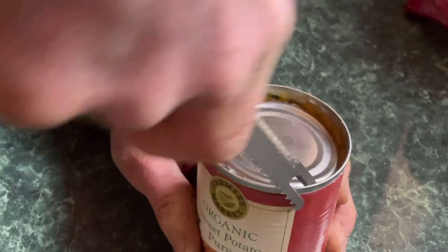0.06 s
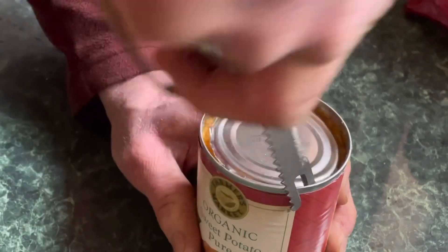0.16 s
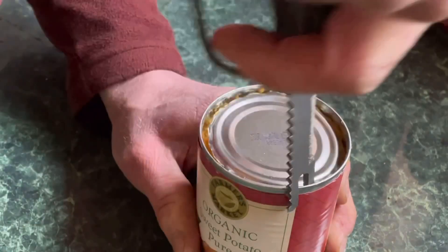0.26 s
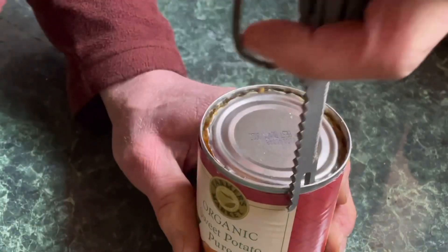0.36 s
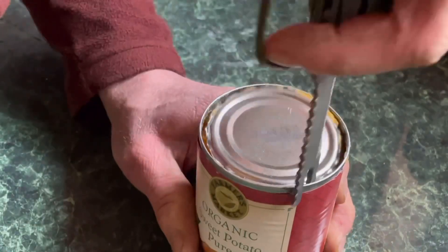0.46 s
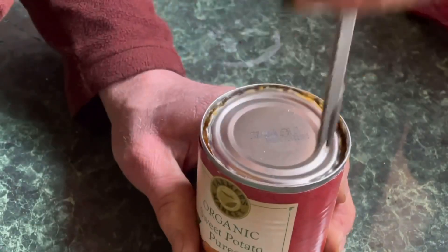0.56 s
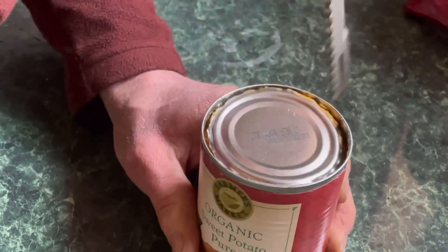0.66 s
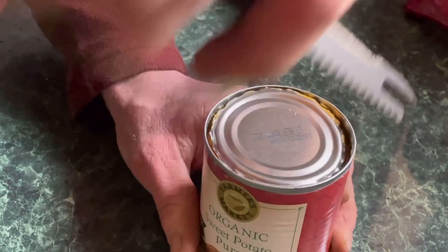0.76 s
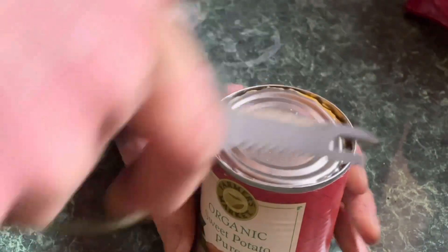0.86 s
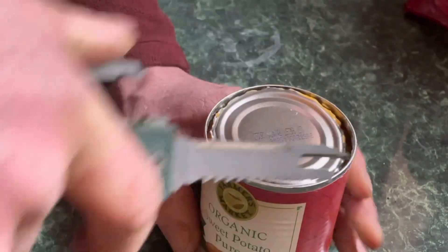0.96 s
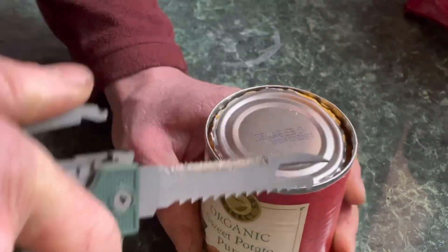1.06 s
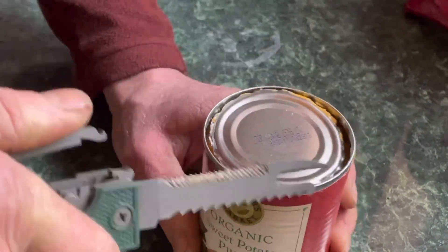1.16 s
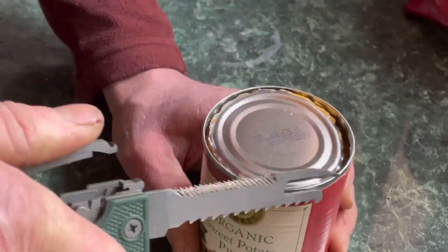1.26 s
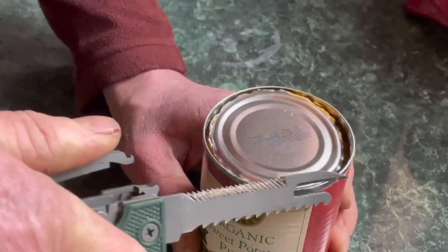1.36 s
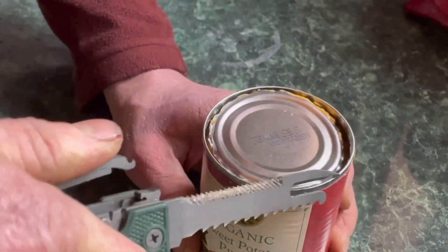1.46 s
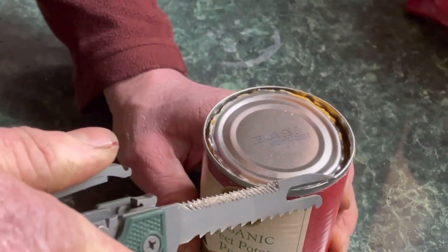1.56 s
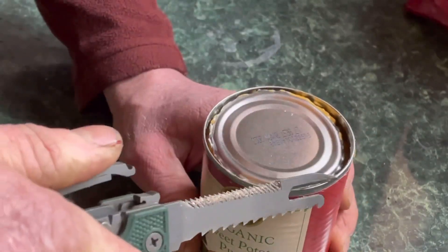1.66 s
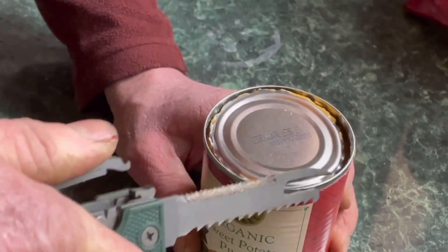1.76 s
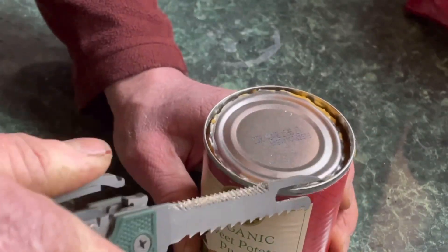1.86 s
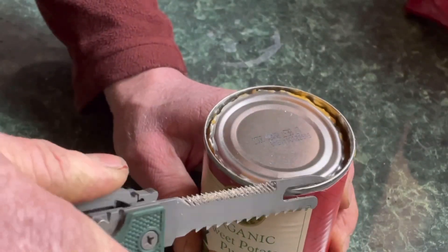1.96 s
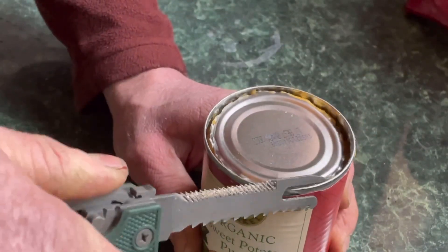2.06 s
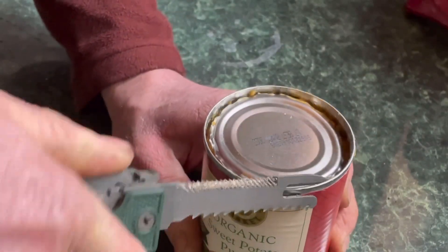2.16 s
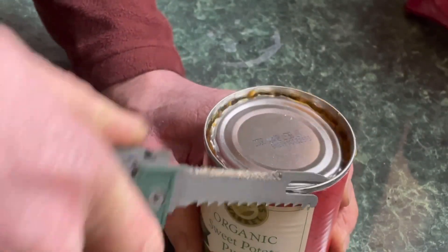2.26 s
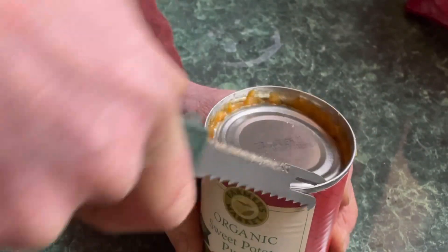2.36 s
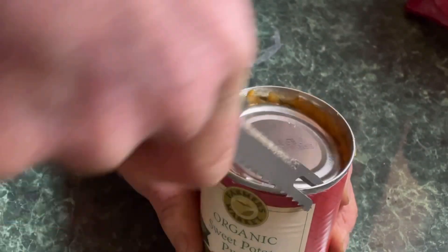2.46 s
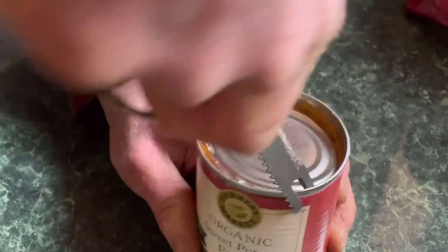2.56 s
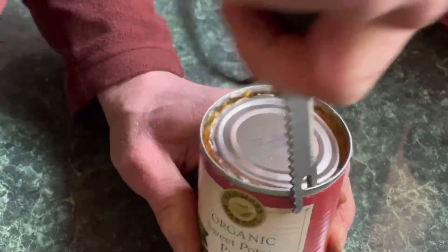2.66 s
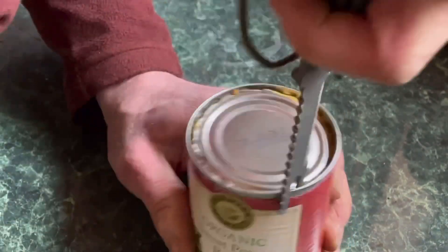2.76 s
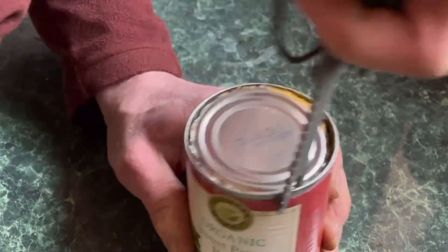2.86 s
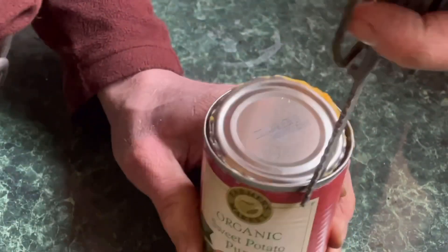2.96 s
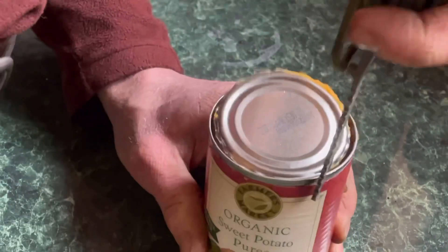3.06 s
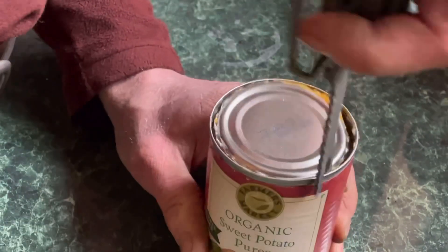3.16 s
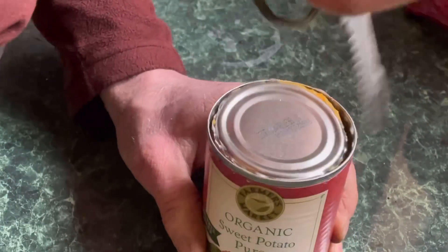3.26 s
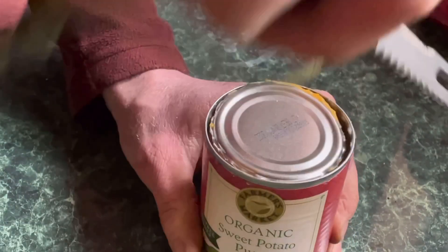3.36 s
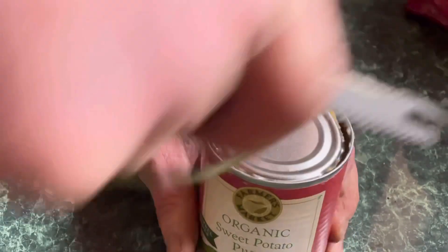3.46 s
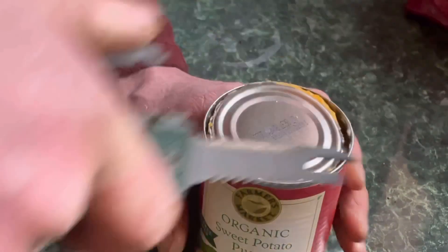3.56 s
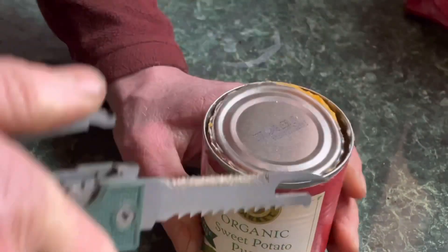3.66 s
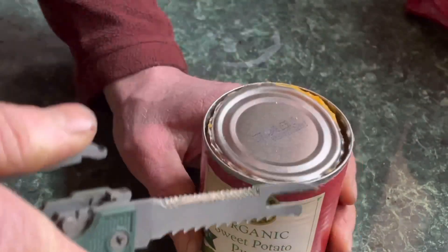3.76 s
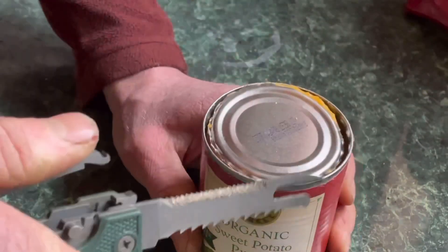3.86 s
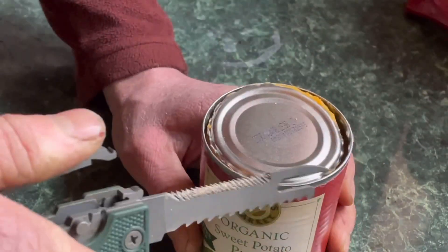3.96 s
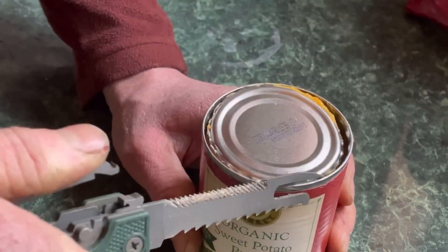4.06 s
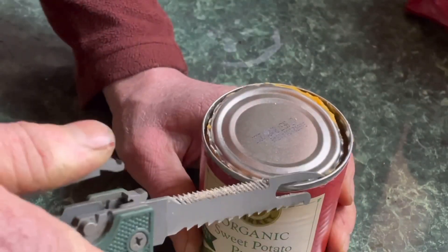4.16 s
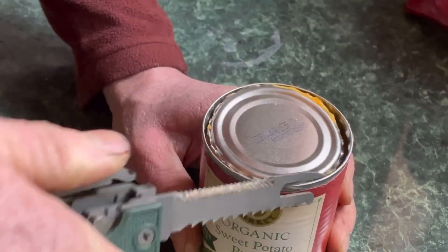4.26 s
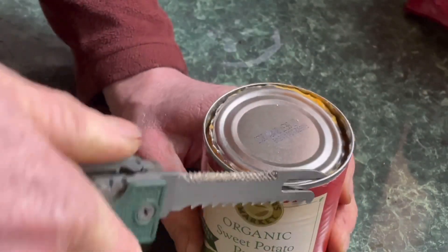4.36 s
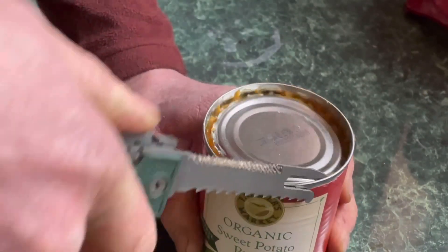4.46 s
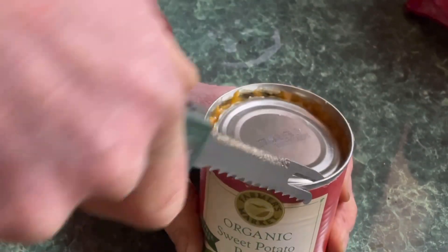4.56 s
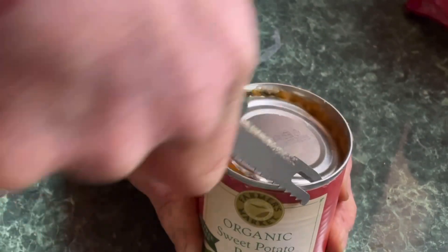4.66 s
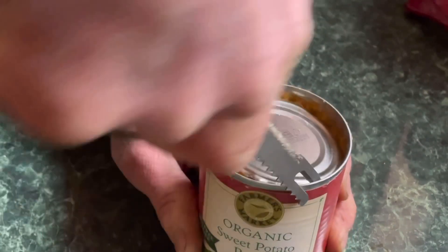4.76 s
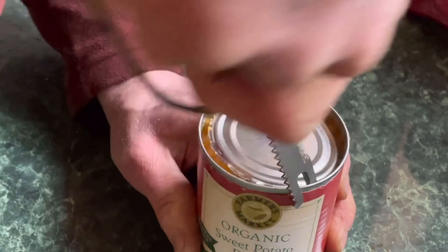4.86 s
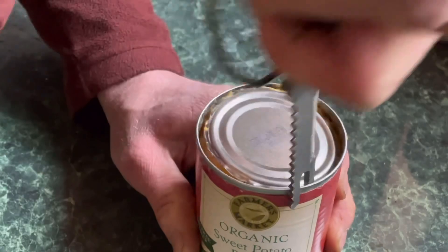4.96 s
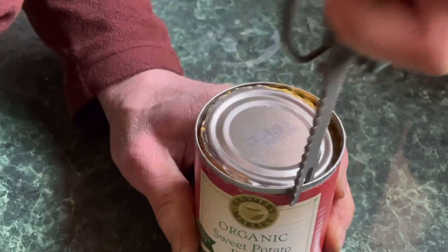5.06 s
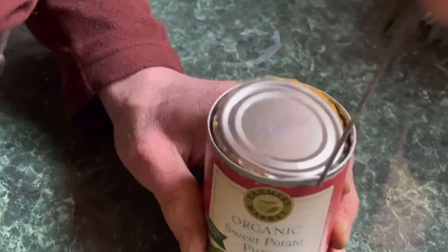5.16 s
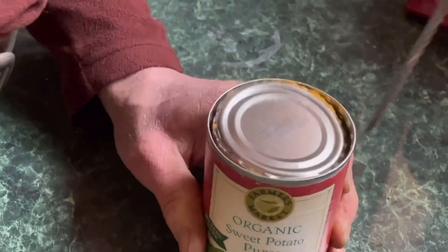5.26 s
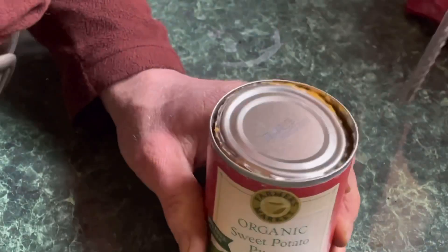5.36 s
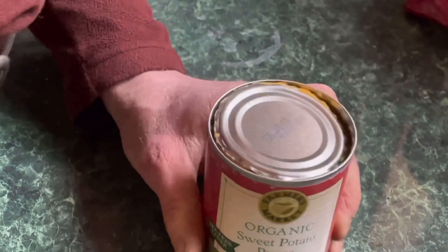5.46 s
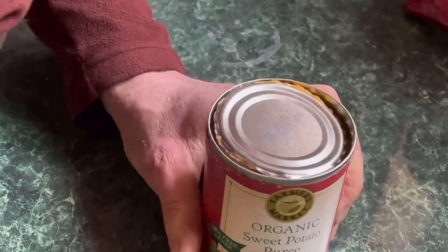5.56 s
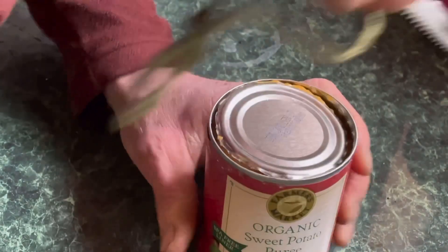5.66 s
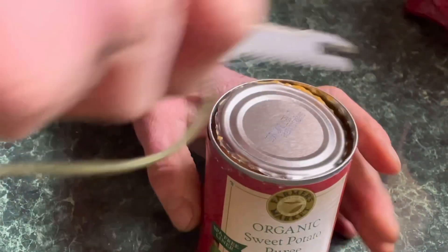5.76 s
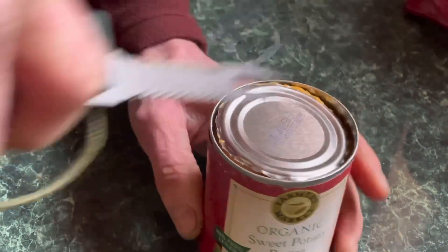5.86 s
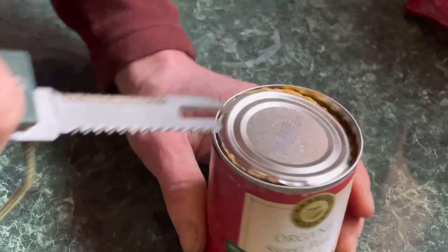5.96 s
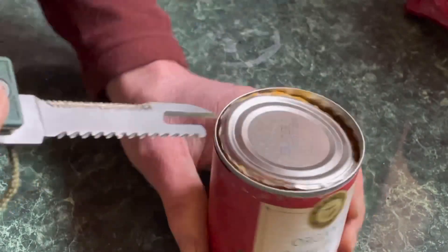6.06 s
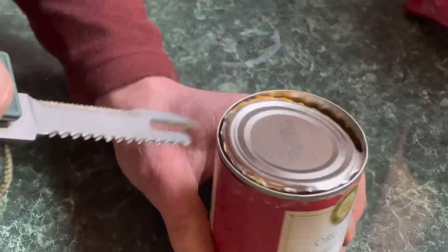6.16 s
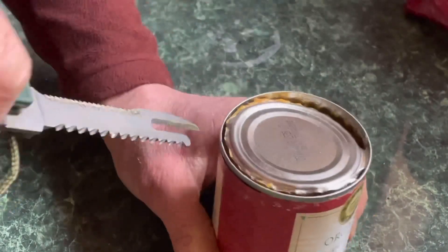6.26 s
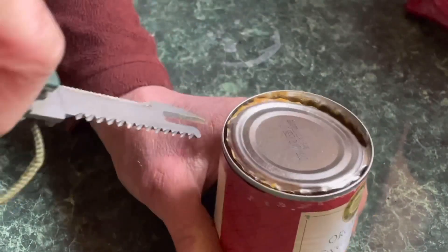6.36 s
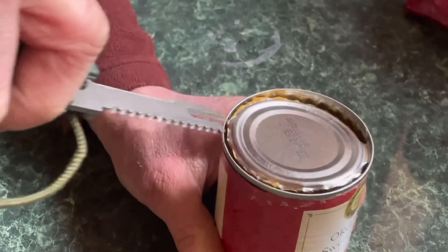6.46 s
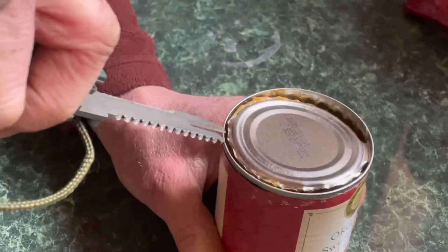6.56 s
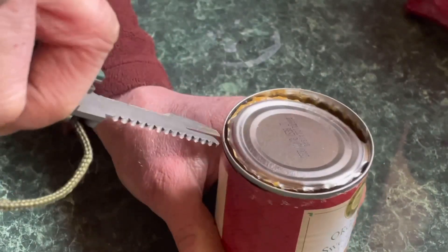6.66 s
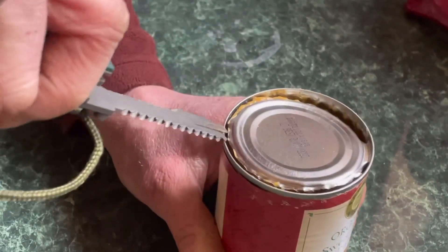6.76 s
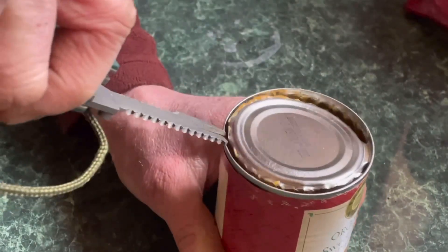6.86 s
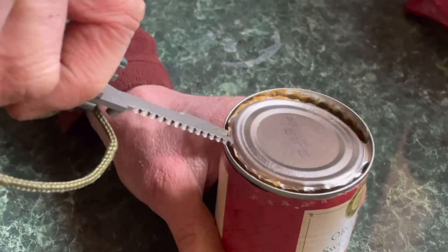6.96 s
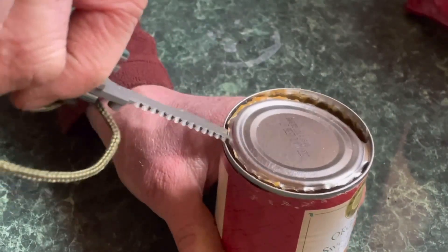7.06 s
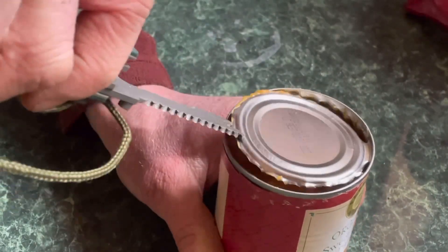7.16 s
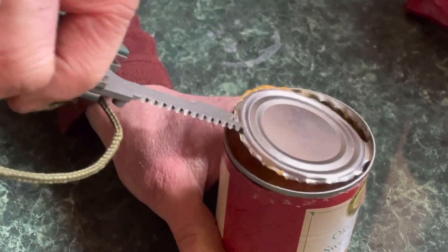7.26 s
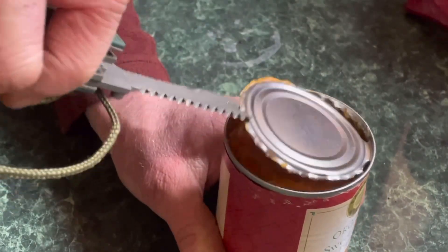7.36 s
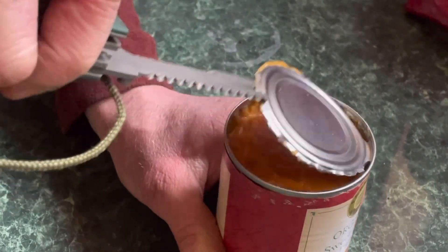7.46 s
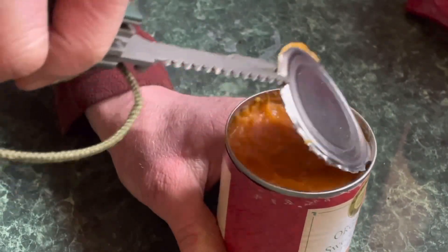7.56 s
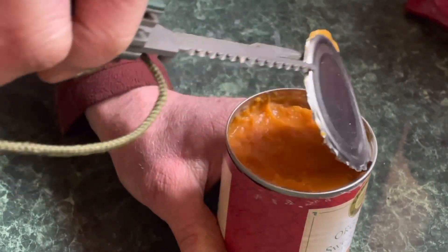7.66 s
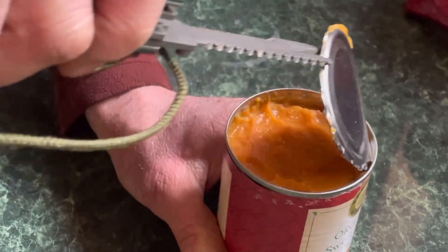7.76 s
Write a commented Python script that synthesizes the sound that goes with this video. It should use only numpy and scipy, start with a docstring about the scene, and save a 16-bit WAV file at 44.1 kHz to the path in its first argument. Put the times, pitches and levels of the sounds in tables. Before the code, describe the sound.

A filled steel can is opened by hand with a hooked pocket-tool blade, heard close on a kitchen counter. Gritty grinding leads to a sharp squeal, then rim scuffs, clicks and dull punching knocks. Levering and squealing return near three and five seconds. The tin is tapped and shifted with light ticks, then short creaks lift the lid. Close stereo microphone, dry small room, faint steady air noise.

```python
"""Kitchen counter, close to a two-port microphone: a tin is opened with the hooked blade of a pocket tool.
The hook grinds at the lid from the start, clicks onto the rim and tears free with a first squeal.
It scuffs the rim, punches the lid and is levered upward, squealing out of the cut twice more near 3 s and at 5 s.
Then the tin is tapped and slid round, and the tip creaks as it prises the lid up.
Knocks ring resonances, stick-slip clicks drive the friction, and diffuse echoes and still air lie behind."""
import sys
import numpy as np
from scipy import signal
from scipy.fft import rfft, irfft
from scipy.io import wavfile
from scipy.ndimage import uniform_filter1d

SR = 44100
rng = np.random.default_rng(int(sys.argv[2]) if len(sys.argv) > 2 else 0)


def wrap_up_sound(samples):
    """Save the sound to the file named by the first command line argument, as 16-bit audio."""
    columns = np.atleast_2d(samples).T
    # keep every value between -1 and 1, then stretch to whole-number steps
    tamed = np.clip(columns, -1, 1)
    steps = np.round(tamed * 32767).astype(np.int16)
    wavfile.write(sys.argv[1], SR, steps)


N = 343980   # samples, 7.8 s

# Still air. Each row: frequency in Hz, relative spectrum level in dB per Hz.
AIR_SPECTRUM = [(15, -37.5), (25, -4.5), (70, -6), (200, -16.5), (405, -15), (1040, -19.5), (1160, -30),
                (1290, -24.5), (7110, -39), (8830, -53.5), (9840, -44), (13200, -33), (16000, -62)]
AIR_DB = -73
# Kitchen decay. Each row: frequency in Hz, time to fall 60 dB in seconds.
ROOM_T60 = [(100, 0.2), (800, 0.1538), (2100, 0.25), (5500, 0.1649), (15000, 0.38)]
# Kitchen echoes ahead of their mix. Each row: frequency in Hz, level in dB.
ROOM_LEVEL = [(100, -8), (500, -4), (1200, -10), (2100, -22), (5500, -11), (15000, -22.5)]
# Microphone ports, phase. Each row: frequency in Hz, lead of left over right in radians.
PORT_PHASE = [(60, .2), (300, -.3), (520, -.7), (950, .7), (1400, 0), (2500, 0), (3700, .5), (5200, .4),
              (5800, -1.1), (7000, -.9), (7800, -2.2), (8600, -3.0), (9600, -3.5), (11800, -5.4),
              (12800, -6.1), (16500, -6.4)]
# Microphone ports, level. Each row: frequency in Hz, left minus right in dB.
PORT_BALANCE = [(60, -2), (200, -2), (500, -2.5), (1100, 4.5), (1500, 0.5), (2100, -1), (15000, 1.5)]
CUTOFF_HZ = 16400

# Friction colours: counter rumble, tin wall, cutting edge, tin sliding on the counter.
# Each row: frequency in Hz, relative spectrum level in dB per Hz.
RUMBLE_SPECTRUM = [(15, -49.5), (25, -20), (70, 2), (113, -4), (145, -1.5), (188, -9), (226, -1.5),
                   (296, -11.5), (344, -15.5), (457, -21.5), (480, -19), (620, -38), (1060, -120)]
WALL_SPECTRUM = [(220, -35.5), (380, -7), (454, -9), (495, -8), (621, -10), (824, -12), (1050, -9),
                 (1440, -16), (1650, -11), (2140, -35.5), (3630, -120)]
EDGE_SPECTRUM = [(4000, -9), (4800, -1.5), (5150, -8.5), (5500, -8.5), (6200, -6.5), (6900, -0.5),
                 (8000, -3.5), (10000, -8), (13300, -4.5), (16500, -13)]
SLIDE_SPECTRUM = [(820, -26.5), (1400, -20.5), (2050, 5.5), (2440, 2.5), (2900, 3), (3430, -2),
                  (4800, -11.5), (6240, -47), (10600, -120)]
# One resonance each of wall and edge that a hard scrape singles out.
# Each holds: frequency in Hz, width in Hz, level in dB against the broad rasp.
WALL_RING = (1080, 200, -1.5)
EDGE_RING = (5450, 390, -7.5)

# In all gesture tables below, the levels hold at the crest of the push, and swell is how far
# below the crest the push starts (negative: above it).
# The hand shifts the tin on the counter.
# Each row: start in seconds, rise in seconds, fall in seconds, rumble in dB, wall in dB, steel in dB, edge in dB.
SLIDES = [(0.55, 0.027, 0.89, -64, -71.5, -74, -66.5), (1.5, 0.15, .1, -59.5, -72, -77, -84),
          (1.98, .04, 0.19, -67, -78.5, -83.5, -80), (3.2, 0.18, 0.52, -66.5, -73.5, -74, -72),
          (5.25, 0.053, 0.45, -60.5, -63.5, -66, -59.5), (5.72, 0.31, 0.12, -56, -51, -55.5, -55),
          (6.16, 0.16, 0.24, -68.5, -78, -79, -81)]
# The blade bears on the tin and rocks it.
# Each row: start in seconds, rise in seconds, fall in seconds, rumble in dB, wall in dB, steel in dB, edge in dB.
PRESSES = [(0.39, 0.02, 0.1, -40, -47.5, -65, -55), (1.19, 0.11, 0.058, -43, -52.5, -62, -66),
           (1.4, .07, 0.33, -51, -63.5, -72.5, -78), (1.67, .04, 0.084, -49.5, -54.5, -53.5, -69),
           (1.79, .11, 0.057, -40, -56.5, -54.5, -67), (2.0, .03, 0.088, -53.5, -84, -83, -78),
           (2.21, .035, .01, -62.5, -61, -59.5, -61.5), (2.77, .02, .09, -51.5, -64, -64, -66),
           (2.85, 0.15, .03, -48.5, -56.5, -59.5, -60.5), (3.04, .05, 0.1, -39.5, -57, -52, -65),
           (3.73, .09, 0.098, -53.5, -58.5, -62, -69.5), (3.98, 0.063, 0.21, -45, -58.5, -59, -81),
           (4.19, .04, 0.67, -56.5, -68.5, -65.5, -66.5), (4.48, .03, .04, -50, -59.5, -57.5, -65),
           (5.015, .07, .2, -40.5, -56.5, -65.5, -67), (6.88, .04, .1, -48, -61, -56, -63.5),
           (7.07, 0.092, 0.1, -48, -70, -60, -65), (7.39, 0.071, 0.029, -48.5, -67.5, -78.5, -75)]
SLIDE_SWELL_DB, PRESS_SWELL_DB = 15.5, 5
RUB_ATTACK_S = 0.014
GRIP_DB = -72   # low rumble of the hand that holds the tin
# The hook is levered through the lid.
# Each row: start in seconds, rise in seconds, fall in seconds, swell in dB of effort, rumble in dB, wall in dB,
# steel in dB, edge in dB, grind in dB, first pitch in Hz, last pitch in Hz.
STROKES = [(0.0, 0.0054, 0.17, -21.5, -41, -44, -40.5, -51.5, -38, 1940, 1780),
           (0.135, 0.013, 0.21, -1.5, -43.5, -50.5, -46.5, -55.5, -38, 1850, 1770),
           (2.246, 0.2, 0.0073, 3.5, -51.5, -50.5, -52, -58.5, -55.5, 2067, 2090),
           (2.438, 0.052, 0.12, 8.5, -39, -42.5, -37, -48.5, -43.5, 2113, 2000),
           (2.6, 0.13, 0.062, 7.5, -46, -53.5, -47.5, -64.5, -43, 1930, 1779),
           (4.53, .14, 0.013, 2.5, -50.5, -53.5, -55.5, -66, -71, 2145, 2140),
           (4.676, 0.11, 0.14, 7.5, -44, -51.5, -38, -58, -41, 2090, 1930),
           (4.885, 0.0075, 0.11, 2, -53, -55.5, -48.5, -55, -44, 1953, 2040)]
# How far each part of a stroke follows the effort, in dB per dB, in the order rumble, wall, steel, edge, grind.
FOLLOWS = [0.99, 1.3, 1.31, 1.7, 1.45]
# Blade rubbing on tin. Each row: frequency in Hz, width in Hz, relative level in dB.
RUBBED_BLADE = [(2080, 170, 6.5), (3040, 50, -24.5), (3655, 120, -5.5), (5100, 140, -16), (5610, 180, -11.5)]

# The hook scuffs the rim. Each row: start in seconds, rise in seconds, fall in seconds, swell in dB,
# wall in dB, low rim modes in dB, high rim modes in dB, edge in dB.
SCUFFS = [(0.78, 0.013, 0.046, 14.5, -51, -52.5, -55.5, -45.5),
          (1.101, 0.0063, 0.021, 9.5, -37.5, -54, -43, -40),
          (1.13, 0.031, 0.01, 17, -33.5, -37, -64.5, -38.5),
          (1.255, 0.028, 0.011, 3, -44, -46.5, -54.5, -58),
          (1.415, 0.051, 0.066, 9.5, -47.5, -51.5, -61, -59),
          (1.645, 0.02, 0.012, 20, -38.5, -38.5, -42, -39), (2.97, 0.029, 0.016, 14, -44, -47.5, -55, -55),
          (3.42, 0.024, 0.022, 22, -47.5, -70, -73.5, -52), (3.805, 0.043, 0.013, 14, -47, -47, -48.5, -44),
          (4.2, 0.02, 0.017, 19, -49, -43, -65, -57), (5.035, 0.0086, 0.034, 5.5, -51, -50.5, -71.5, -67.5),
          (5.54, .012, .03, 2, -60, -64, -63, -53)]
# The tip creaks under the lid. Each row: start in seconds, rise in seconds, fall in seconds, swell in dB,
# wall in dB, low lid modes in dB, high lid modes in dB, edge in dB.
PRISES = [(6.75, 0.0074, 0.025, 7, -71.5, -53, -78, -76.5),
          (6.879, 0.002, 0.043, 6, -42.5, -28, -49, -43.5), (6.937, .006, 0.016, 6, -66, -37, -58, -54),
          (7.065, 0.0063, 0.045, 1, -63, -33, -47, -46),
          (7.076, 0.084, 0.013, 13.5, -39.5, -27, -47.5, -46.5),
          (7.18, 0.054, 0.019, 12.5, -52, -54, -71, -64.5), (7.31, .018, 0.03, 10, -73, -68, -87, -85),
          (7.405, 0.042, 0.032, 8.5, -74, -61, -88, -85)]
# The blade squeals out of the cut. Each row: start in seconds, rise in seconds, fall in seconds, swell in dB,
# wall in dB, first blade modes in dB, second blade modes in dB, edge in dB.
TEARS = [(0.405, 0.069, 0.022, 21, -28.5, -21.5, -24, -29),
         (3.085, 0.032, 0.016, 16, -37.5, -33, -43.5, -47.5),
         (3.124, 0.035, .03, 11, -37.5, -19, -23.5, -30), (5.127, 0.037, 0.056, 5.5, -33, -22.5, -39, -36)]
SCRAPE_ATTACK_S, SCRAPE_RELEASE_S = 0.0034, 0.0062
# Steel modes of the rim under the hook, the lid while it is prised, and the blade.
# Each row: frequency in Hz, width in Hz, relative level in dB.
RIM_LOW = [(1680, 320, -9.5), (2182, 160, 3), (2800, 550, -11)]
RIM_HIGH = [(3644, 570, 2.5), (4340, 200, -5.5)]
LID_LOW = [(1930, 95, 3.5), (2146, 93, 5.5), (2490, 185, -10.5), (2990, 320, -19)]
LID_HIGH = [(3130, 310, -13), (3900, 230, 10)]
BLADE_LOW = [(1770, 40, -20), (2070, 26, -12), (2090, 38, -2.5), (2135, 49, 4), (2210, 40, -1),
             (2450, 75, -14), (2710, 73, -18), (3024, 220, -26)]
BLADE_HIGH = [(3050, 300, -16), (3370, 140, -18), (3730, 56, 2), (3910, 43, -3.5), (4000, 80, -15.5),
              (4280, 150, -11)]

# Steel meets tin. Each row: start in seconds, then thump, wall, lid and edge in dB (energy as a level
# over 10 ms, ahead of a trim), favoured bounce in Hz, favoured wall mode in Hz.
CONTACTS = [(0.141, -47, -45, -37.5, -53.5, 228, 925), (0.3346, -41.5, -49.5, -58.5, -55.5, 140, 1050),
            (0.3799, -39, -45, -60.5, -69, 299.6, 892), (0.541, -74, -64, -57, -48, 305, 450),
            (0.6366, -42.5, -57, -46.5, -35.5, 232, 910), (0.8074, -44.5, -47, -42.5, -35.5, 99, 1135),
            (0.8244, -60.5, -63, -54.5, -36, 103, 1225), (0.9551, -75, -66, -57.5, -51, 100.4, 545),
            (1.099, -42.5, -34.5, -37.5, -35.5, 100, 750), (1.1588, -19.5, -24.5, -28, -32.5, 229, 864),
            (1.275, -28.5, -41.5, -42, -76, 100, 1030), (1.6684, -30.5, -29, -24, -25, 229, 750),
            (1.7665, -21, -23, -21.5, -39.5, 195, 1000), (2.0354, -55, -59, -58, -48.5, 140, 1200),
            (2.2466, -42.5, -62, -63.5, -43.5, 149, 955), (2.8476, -52.5, -58, -45.5, -46.5, 154, 499),
            (2.952, -47, -45, -45, -46.5, 230, 1210), (2.979, -28.5, -40, -53, -58.5, 227, 500),
            (2.999, -41, -37.5, -56.5, -61.5, 223.7, 496), (3.0602, -46.5, -61.5, -55, -60.5, 300, 430),
            (3.439, -46, -47.5, -46.5, -50, 160, 945), (3.4573, -53, -51, -67, -37, 155, 454),
            (3.5856, -74, -59, -58, -54, 130, 1290), (3.7267, -49.5, -41, -49, -32.5, 225, 603),
            (3.9731, -43.5, -39, -36.5, -36.5, 235, 910), (4.0378, -22.5, -22.5, -21.5, -33.5, 139, 930),
            (4.2188, -31, -54, -48.5, -52.5, 223.6, 935), (4.307, -58, -68, -59, -50, 120, 506),
            (4.4747, -47, -40.5, -41, -39.5, 163, 940), (5.1402, -16, -16.5, -34, -37, 230, 960),
            (5.235, -57, -50, -48.5, -44, 190, 447), (5.2886, -63, -52, -58, -56.5, 100, 427),
            (5.4134, -50, -34.5, -30.5, -23, 319.3, 684), (5.4441, -48, -40, -35.5, -28.5, 330, 580),
            (5.4711, -60.5, -48.5, -44, -36, 350, 1180), (5.495, -62, -55, -69.5, -45.5, 115, 1170),
            (5.525, -58, -51.5, -62, -45, 227.5, 1175), (5.566, -73, -55.5, -64, -40.5, 145, 695),
            (5.571, -63, -60, -62, -43, 135, 1190), (5.8039, -72, -69, -58, -47, 125, 1160),
            (5.8626, -69, -59, -53, -45, 240, 1060), (5.8855, -59, -58, -52.5, -48, 237, 1000),
            (5.9354, -50, -46.5, -45.5, -38.5, 240, 1200), (5.992, -45.5, -51, -41.5, -34, 250, 1180),
            (6.8153, -49, -41, -45, -54, 99, 500), (6.8797, -38.5, -41.5, -39.5, -51, 136, 523),
            (6.963, -48, -42.5, -54, -68, 110, 506), (7.0665, -63, -58, -42, -57, 136, 515),
            (7.4366, -40.5, -61.5, -60, -71, 230, 435), (7.7053, -69, -54, -47.5, -34.5, 340, 1190)]
# Wall, lid and edge of a contact. Each row: low limit in Hz, high limit in Hz (held within the sample rate),
# burst decay in seconds.
CONTACT_PARTS = [(350, 1640, 0.0028), (1340, 5850, 0.0018), (4600, 28000, 0.0016)]
# The filled tin bouncing on the counter. Each row: frequency in Hz, width in Hz, relative level in dB.
BOUNCE = [(75, 9.4, 7), (135, 45, 1.5), (179, 55, 2.5), (231, 57, 2.5), (340, 92, -4.5)]
# The thin steel of the tin. Each row: frequency in Hz, width in Hz, relative level in dB.
TIN = [(500, 94, 2), (693, 140, -3.5), (860, 170, -1), (1120, 120, -3), (1380, 250, -3.5),
       (1690, 640, -5.5), (1893, 250, 0.5), (2196, 60, 3.5), (2351, 67, -1), (3030, 590, -6),
       (3844, 260, -10), (4127, 200, -10.5), (5360, 710, -14.5), (6270, 1300, -8.5), (10074, 9100, -12),
       (14100, 730, -6.5)]


def from_db(db):
    """Decibels to gain."""
    return np.exp(np.asarray(db) * (np.log(10) / 20))


def rms_one(x):
    """Scale to rms 1."""
    return x / np.sqrt(np.mean(x ** 2) + 1e-20)


def at_hz(points, hz):
    """Read a table on a log-frequency axis."""
    f, value = np.transpose(points)
    return np.interp(np.log(np.maximum(hz, 1)), np.log(f), value)


def band(x, low, high, order=2):
    """Causal band-pass."""
    limits = [low, min(high, SR / 2 - 1000)]
    return signal.sosfilt(signal.butter(order, limits, "band", fs=SR, output="sos"), x)


def coloured(x, spectrum):
    """Give a steady sound a spectrum that falls away beyond its ends; rms 1."""
    hz = np.arange(N // 2 + 1) * SR / N + 1
    ends = np.minimum(1, np.minimum(hz / spectrum[0][0], spectrum[-1][0] / hz)) ** 6
    return rms_one(irfft(rfft(x) * from_db(at_hz(spectrum, hz)) * ends, N))


def resonate(x, modes):
    """Parallel resonances with alternating signs; rms 1."""
    out = 0
    for k, (hz, width, db) in enumerate(modes):
        r = np.exp(-np.pi * width / SR)   # a wider resonance dies sooner
        poles = [1, -2 * r * np.cos(2 * np.pi * hz / SR), r * r]
        ring = signal.lfilter([1, 0, -1], poles, x + 1e-18)
        out = out + (-1) ** k * from_db(db) * (1 - r * r) * ring
    return rms_one(out)


def drift(rate):
    """Slow chance with spread 1, taking a new value `rate` times a second."""
    knots = rng.standard_normal(int(N / SR * rate) + 2)
    return rms_one(np.interp(np.arange(N) / SR * rate, np.arange(len(knots)), knots))


def slips(per_s, spread_db, hiss):
    """Stick and slip: clumped tiny clicks of uneven size over a smooth hiss."""
    sizes = from_db(spread_db * np.minimum(rng.exponential(1, N), 4)) * rng.choice([-1, 1], N)
    clumping = from_db(3 * drift(90))
    born = rng.random(N) < per_s * clumping / SR
    return rms_one(sizes * born) + hiss * rng.standard_normal(N)


def steadied(x, seconds):
    """The hand's force holds the level of a vibration; fast grain stays."""
    return x / np.sqrt(uniform_filter1d(x ** 2, int(seconds * SR) + 1) + 1e-6)


def effort(start, rise, fall, swell_db, fade_db, attack_s, release_s, follows=1):
    """One push of the hand as a gain: it takes hold, swells to a crest, fades and lets go."""
    first = int(max(start, 0) * SR)
    t = np.arange(min(N - first, SR)) / SR
    level_db = np.interp(t, [0, rise, rise + fall], [-swell_db, 0, -fade_db])
    taking_hold = np.minimum(t / attack_s, 1)
    letting_go = np.exp(-np.maximum(t - rise - fall, 0) / release_s)
    gain = np.zeros(N)
    gain[first:first + len(t)] = from_db(follows * level_db) * taking_hold * letting_go
    return gain


def still_air():
    """Steady noise behind the work, independent at the two ports."""
    return from_db(AIR_DB) * coloured(rng.standard_normal((2, N)), AIR_SPECTRUM)


def kitchen(x, first_echo_s=.004):
    """Three unrelated sets of diffuse echoes (left, right, shared), decaying at each band's own rate."""
    t, response = np.arange(SR // 2) / SR, 0
    edges = 50 * 2. ** np.arange(10)   # octaves
    for low, high in zip(edges, edges[1:]):
        hz = np.sqrt(low * high)
        fade = from_db(-60 * t / at_hz(ROOM_T60, hz)) * (t > first_echo_s)
        echoes = rng.standard_normal(size=(3, len(t))) * fade / np.sqrt(np.sum(fade ** 2))
        response = response + from_db(at_hz(ROOM_LEVEL, hz)) * band(echoes, low, high)
    return signal.oaconvolve(x[None], response, axes=1)[:, :N]


def ports(x):
    """The two microphone ports take the near sound with their own phase and level."""
    hz = np.arange(N // 2 + 1) * SR / N
    share = np.array([[.5], [-.5]])   # half of each difference to left, half to right
    phase = np.exp(1j * share * at_hz(PORT_PHASE, hz))
    return irfft(rfft(x) * phase * from_db(share * at_hz(PORT_BALANCE, hz)), N)


def rubs(rows, swell_db, fade_db, release_s):
    """Gains of rumble, wall, steel and edge over a series of rubs."""
    return sum(from_db(levels)[:, None] * effort(s, rise, fall, swell_db, fade_db, RUB_ATTACK_S, release_s)
               for s, rise, fall, *levels in rows)


def strokes(fade_db=9, release_s=.012):
    """Gains of rumble, wall, steel, edge and grind: all follow the effort of each levering stroke."""
    gains = []
    for k, follows in enumerate(FOLLOWS):
        gains.append(sum(
            from_db(row[k]) * effort(s, rise, fall, swell_db, fade_db, RUB_ATTACK_S, release_s, follows)
            for s, rise, fall, swell_db, *row in STROKES))
    return np.array(gains)


def grind(force, half_width_hz=150, wander_hz=40):
    """The hook drags through the lid: a band of the force follows the cut's wavering, gliding resonance."""
    points = []
    for s, rise, fall, *_, first_hz, last_hz in STROKES:
        points += [(s, first_hz), (s + rise + fall, last_hz)]
    pitch = np.interp(np.arange(N) / SR, *np.transpose(points))
    turn = np.exp(2j * np.pi * np.cumsum(pitch + wander_hz * drift(29)) / SR)
    # shift the resonance down to 0 Hz, low-pass there, shift back
    low_pass = signal.butter(2, half_width_hz, fs=SR, output="sos")
    tone = (signal.sosfilt(low_pass, force / turn) * turn).real
    return steadied(rms_one(tone), 0.051)


def handling(catch_db=3.0, bump_db=2.5):
    """Levering rocks the tin on the counter and rubs the blade on it; between bites the hand slides it round."""
    cutting = strokes()
    biting = cutting[:4] + rubs(PRESSES, swell_db=PRESS_SWELL_DB, fade_db=10.5, release_s=0.013)
    sliding = rubs(SLIDES, swell_db=SLIDE_SWELL_DB, fade_db=9, release_s=0.059)
    rumble, wall, _, edge = np.hypot(biting, sliding)
    blade_steel, slide_steel, grinding = biting[2], sliding[2], cutting[4]

    bite = blade_steel / (blade_steel + slide_steel + 1e-9)   # share of the friction that is blade on tin
    catching = from_db(catch_db * bite * drift(110))   # the edge catches and lets go
    force = catching * slips(per_s=820, spread_db=2.5, hiss=0.73)
    rub = force + 0.94 * rng.standard_normal(N)

    steady_rumble = steadied(coloured(rng.standard_normal(N), RUMBLE_SPECTRUM), 0.084)
    bumps = from_db(bump_db * drift(30)) * steady_rumble
    blade = resonate(band(force, 1500, 6200), RUBBED_BLADE)
    out = np.hypot(rumble, from_db(GRIP_DB)) * bumps
    out += wall * coloured(rub, WALL_SPECTRUM) + edge * coloured(rub, EDGE_SPECTRUM)
    out += blade_steel * blade + slide_steel * coloured(rub, SLIDE_SPECTRUM)
    return out + grinding * grind(force)


def ringing(force, spectrum, ring):
    """A broad rasp with one resonance standing out of it."""
    hz, width, db = ring
    return coloured(force, spectrum) + from_db(db) * resonate(force, [(hz, width, 0)])


def scrape(rows, low_modes, high_modes, fade_db, wall_lead_s, hold_s=0.02):
    """Hard slips ring the wall, two groups of steel modes and the edge together; the wall gives way first."""
    force = slips(per_s=1000, spread_db=2.0, hiss=0.55)
    voices = [ringing(force, WALL_SPECTRUM, WALL_RING),
              resonate(band(force, 1300, 3600), low_modes),
              resonate(band(force, 2700, 5000), high_modes),
              ringing(force, EDGE_SPECTRUM, EDGE_RING)]
    out = 0
    for k, voice in enumerate(voices):
        lead = wall_lead_s * (k == 0)   # the wall crests earlier
        gain = 0
        for s, rise, fall, swell_db, *levels in rows:
            push = effort(s, max(rise - lead, SCRAPE_ATTACK_S), fall + lead, swell_db, fade_db,
                          SCRAPE_ATTACK_S, SCRAPE_RELEASE_S)
            gain = gain + from_db(levels[k]) * push
        out = out + gain * steadied(voice, hold_s)
    return out


def scrapes():
    """The hook scuffs the rim, the blade tears free and the tip prises the lid."""
    return (scrape(SCUFFS, RIM_LOW, RIM_HIGH, fade_db=13.5, wall_lead_s=0.0024)
            + scrape(TEARS, BLADE_LOW, BLADE_HIGH, fade_db=18.5, wall_lead_s=0.038)
            + scrape(PRISES, LID_LOW, LID_HIGH, fade_db=18, wall_lead_s=0.00286))


def contacts(travel_s=.0009, dispersion=0.69, rattle_db=-16, rattle_s=0.021, push_s=0.00031,
             focus=3.0, sharpness=8.1, trims_db=(-0.13, -1.4, -1.1, 0.0)):
    """A crunch and fading rattle ring the steel, a push bounces the tin; bending waves bring the treble first."""
    size = 6144   # samples in one contact
    hz, t = np.arange(size // 2 + 1) * SR / size + 1, np.arange(size) / SR
    delay = travel_s * (1000 / np.maximum(hz, 220)) ** dispersion   # travel_s is the delay at 1 kHz
    bending = np.exp(-2j * np.pi * np.cumsum(delay) * SR / size)
    noise = rng.standard_normal((len(CONTACTS), 4, size))
    click = 1. * (t == 0)

    push = np.exp(-t / push_s) + 0.026 * noise[:, 0] * np.exp(-t / .02)
    parts = [rfft(push) * rfft(band(resonate(click, BOUNCE), 40, 430))]
    for k, (low, high, decay) in enumerate(CONTACT_PARTS):
        rattle = from_db(rattle_db) * decay / 0.0034 * np.exp(-t / rattle_s)
        crunch = noise[:, k + 1] * (np.exp(-t / decay) + rattle)
        parts.append(rfft(crunch) * rfft(band(resonate(click, TIN), low, high, order=3)))

    # grip and point of contact favour one bounce and one wall mode
    for k, favoured in enumerate(np.array(CONTACTS).T[-2:, :, None]):
        parts[k] = parts[k] * (1 + focus / (1 + 1j * sharpness * (hz / favoured - favoured / hz)))

    out = np.zeros(N + size)
    over_10_ms = np.sqrt(SR / 100 / size)
    for k, (part, trim_db) in enumerate(zip(parts, trims_db)):
        for (s, *levels), ring in zip(CONTACTS, irfft(part * bending)):
            at = int(s * SR)
            out[at:at + size] += from_db(levels[k] + trim_db) * rms_one(ring) * over_10_ms
    return out[:N]


def scene(shared_echo=0.67, own_echo=0.54):
    """The still air, the work on the tin close by, and its echoes."""
    air = still_air()
    near = handling() + scrapes() + contacts()
    left, right, shared = kitchen(near)
    return ports(near + shared_echo * shared) + own_echo * np.array([left, right]) + air


def record(dry):
    """The top is cut steeply."""
    return signal.sosfilt(signal.ellip(10, .1, 80, CUTOFF_HZ, fs=SR, output="sos"), dry)


dry = scene()
out = record(dry)
wrap_up_sound(out)
```